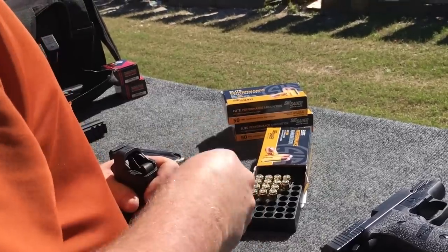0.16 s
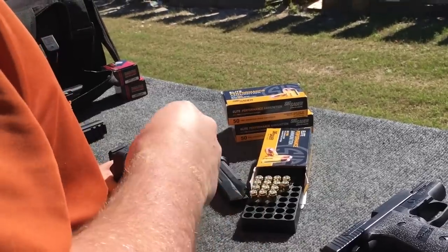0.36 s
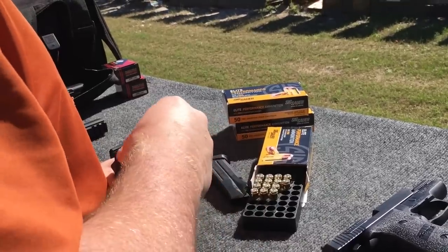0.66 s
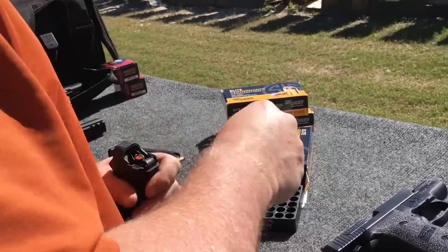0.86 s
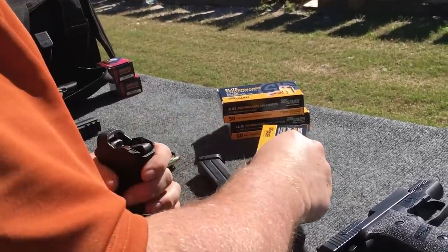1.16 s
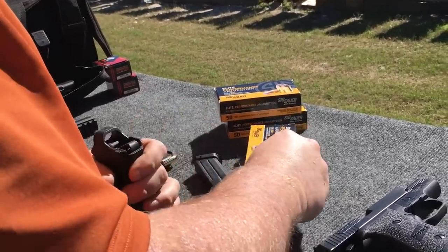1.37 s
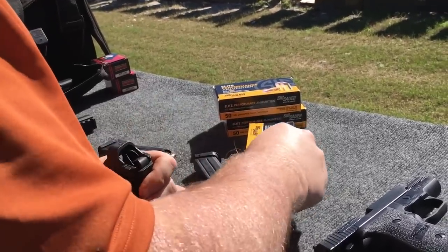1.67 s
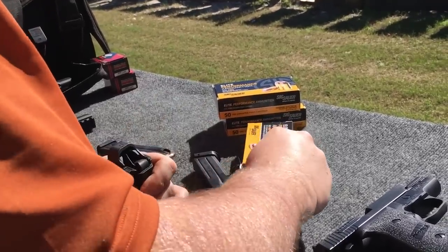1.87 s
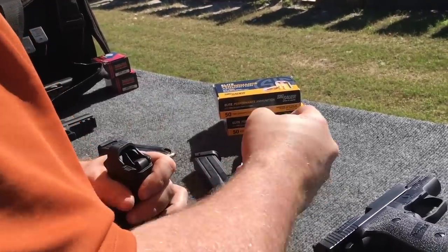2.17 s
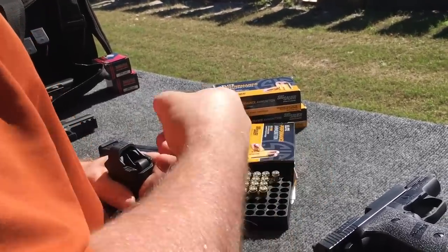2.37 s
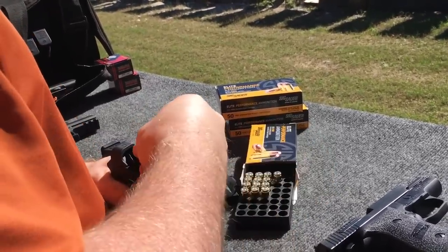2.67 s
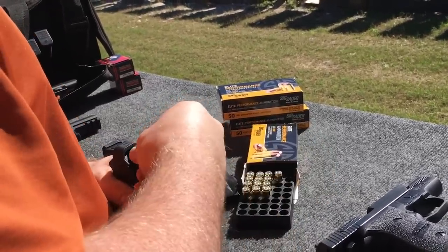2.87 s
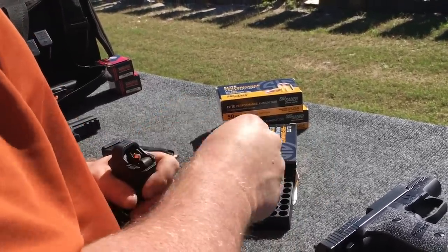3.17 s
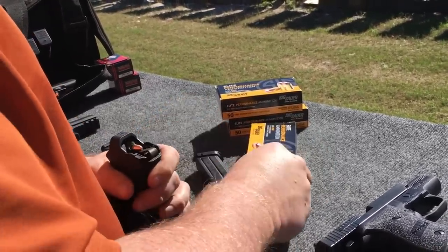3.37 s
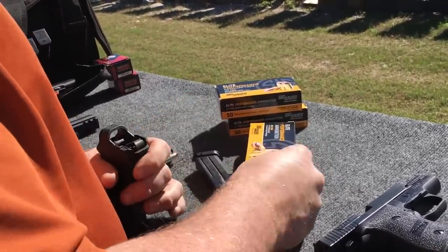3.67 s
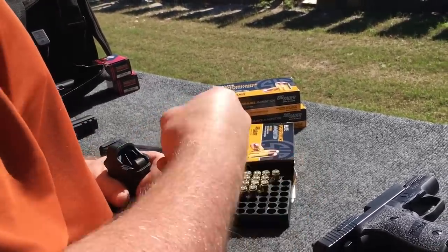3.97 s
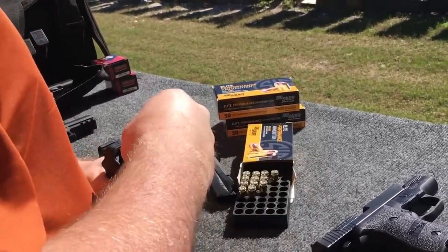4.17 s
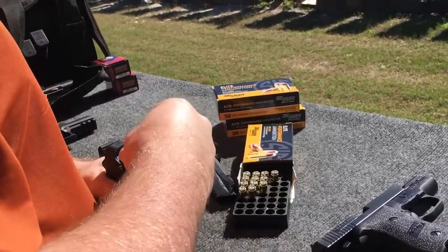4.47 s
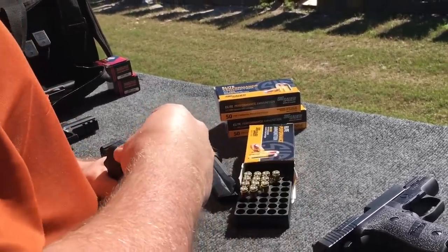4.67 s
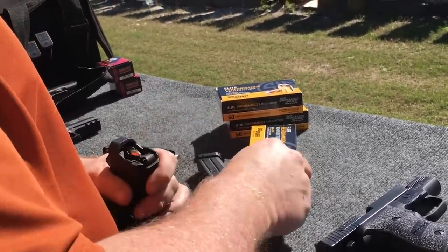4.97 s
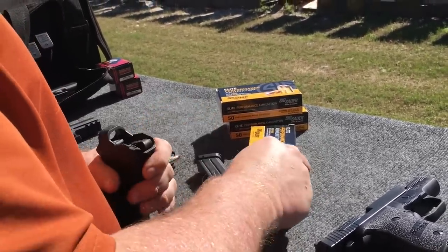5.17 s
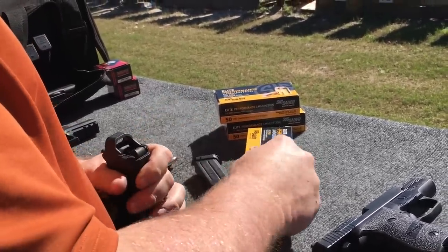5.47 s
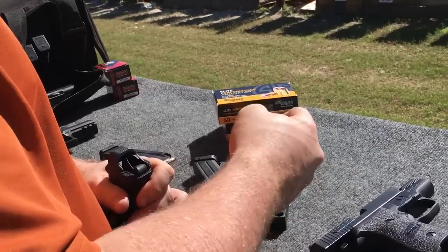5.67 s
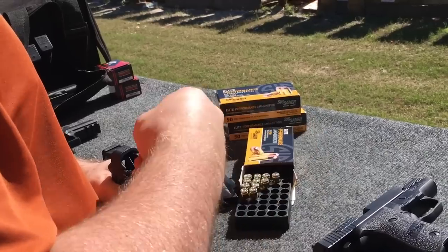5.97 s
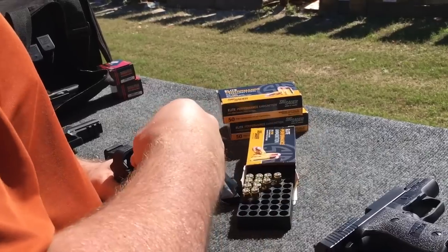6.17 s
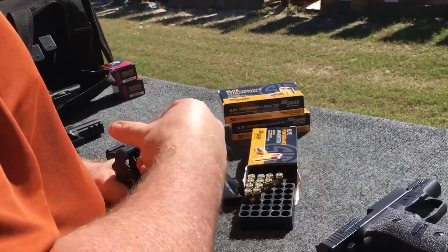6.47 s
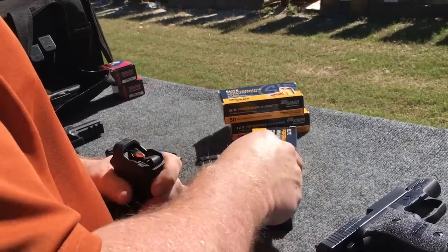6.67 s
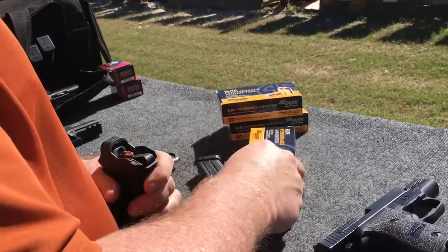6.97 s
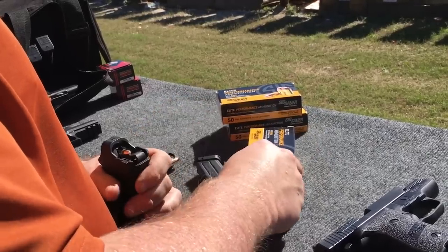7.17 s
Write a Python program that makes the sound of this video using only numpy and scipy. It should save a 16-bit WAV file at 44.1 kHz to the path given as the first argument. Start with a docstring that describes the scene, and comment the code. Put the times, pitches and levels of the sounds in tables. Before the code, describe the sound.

Close, crisp handling clicks come in uneven bursts as cartridges are pushed into a magazine with a plastic loader; a brass case briefly rings, and fingers and parts rub softly with tiny squeaks. Around them, gusts buffet the microphone with bassy pushes, flutter and popping snaps, growing stronger in the second half. Faint, smooth road noise lies far behind. Single-channel outdoor sound, dry and near.

```python
"""Cartridges are pressed into a pistol magazine with a plastic loader, outdoors on a carpeted table.
Each contact is a burst of noise that rings plastic, brass and steel close by; now and then a case rings on.
Slides are grainy noise that sticks and slips, with brief narrow squeaks.
Wind buffets the microphone with rumble, flutter, sagging low pushes and abrupt snaps.
Far traffic roars steadily behind it all, as smooth coloured noise."""
import sys
import numpy as np
from scipy import signal
from scipy.fft import rfft, irfft
from scipy.io import wavfile
from scipy.ndimage import uniform_filter1d

SR = 44100
rng = np.random.default_rng(int(sys.argv[2]) if len(sys.argv) > 2 else 0)


def store_pcm(level_fs):
    """Save levels as 16-bit WAV."""
    pcm = np.round(np.clip(level_fs, -1, 1) * 32767).astype(np.int16)
    wavfile.write(sys.argv[1], SR, np.atleast_2d(pcm).T)


N = 322812

# Contacts. Each row: start in seconds, then level in dB of loader body, brass case, magazine steel, sharp edge.
CONTACTS = [(0.605, -57.5, -39, -40.5, -40), (0.659, -55, -60, -52.5, -57), (0.699, -64, -50, -52, -57),
            (0.723, -61, -54, -61, -78), (0.76, -46, -49, -55, -53), (0.7677, -49, -35, -49.5, -39.5),
            (0.7944, -49, -61, -53, -55), (0.991, -59, -48, -54, -73), (1.0074, -61, -40, -45, -57),
            (1.021, -50, -50, -58, -60), (1.027, -40.5, -37, -31, -34), (1.0787, -56, -66, -61, -66),
            (1.106, -52, -49.5, -54.5, -56), (1.374, -47, -62, -66, -75), (1.404, -44, -53, -59, -62),
            (1.4571, -47, -55, -45, -48), (1.4829, -47.5, -77, -59, -72), (1.62, -62, -60, -68, -83),
            (1.6853, -39, -44, -49.5, -58), (1.7265, -48.5, -64, -75, -68), (1.791, -54, -58.5, -61, -79),
            (2.0835, -55, -69, -73, -87), (2.1004, -41.5, -55, -62, -85), (2.745, -47, -51, -43, -52),
            (2.8196, -53.5, -45, -45.5, -51), (2.9325, -55, -58, -45, -63), (2.9746, -52, -67, -53.5, -75),
            (3.0822, -55, -56.5, -49, -53.5), (3.089, -62, -59, -56, -69), (3.1441, -49, -41, -49.5, -50.5),
            (3.1521, -47, -54, -72, -76), (3.377, -62, -61, -66, -84.5), (3.3938, -61.5, -54, -59, -60),
            (3.405, -53, -50, -54, -56), (3.4176, -71, -52, -59, -62), (3.429, -56, -51, -44, -53),
            (3.4359, -35, -42, -29, -33), (3.4821, -49, -45, -39.5, -38.5), (3.5123, -51, -62, -53, -50),
            (3.519, -52, -59, -47.5, -56), (3.745, -53, -75, -65, -83), (3.799, -45.5, -54, -41.5, -49),
            (3.8635, -51, -44, -47, -55), (3.889, -64, -61, -61, -56), (3.924, -68, -58.5, -53, -56),
            (3.9605, -55, -63, -62, -77), (4.3543, -51, -46.5, -50, -60.5),
            (4.3606, -47.5, -43.5, -53, -58), (4.4702, -50.5, -52, -50.5, -57.5),
            (4.6196, -51.5, -45.5, -54, -61), (4.704, -54.5, -63, -55, -57), (4.7243, -55, -54, -60, -74),
            (4.8467, -52, -53, -53, -55), (4.8546, -49, -41, -48.5, -55), (4.8615, -52, -65, -58, -58),
            (4.9703, -54.5, -49, -58, -47.5), (5.005, -73, -46, -63, -60), (5.0222, -52, -45.5, -59, -49),
            (5.0369, -30, -46, -36.5, -39), (5.0405, -49, -41, -30.5, -33), (5.1057, -50.5, -40, -34, -39),
            (5.1443, -69, -58, -50, -54), (5.152, -46, -53, -51, -45.5), (5.2114, -50.5, -73, -66, -79),
            (5.256, -53, -82, -67, -68), (5.3915, -52, -52, -45.5, -43), (5.5557, -56, -56, -59, -57),
            (5.5838, -43, -51.5, -53, -80), (5.667, -41.5, -51, -57, -66), (5.6758, -48, -51, -49, -61),
            (6.2398, -44, -46.5, -49, -47.5), (6.291, -56, -56, -70, -78), (6.3149, -64, -39, -34.5, -36),
            (6.38, -58, -58, -59, -71), (6.5003, -50, -51, -58, -52), (6.5152, -53, -47, -63, -65),
            (6.5312, -48, -41, -44, -42.5), (6.5555, -64, -59, -63, -57), (6.7074, -57, -49, -51, -44.5),
            (6.7165, -63, -47, -61, -58.5), (6.733, -53, -57, -60, -62.5), (6.7443, -28, -37, -23, -26.5),
            (6.7512, -56, -50, -35, -32), (6.7965, -56, -58, -49, -56), (6.8295, -47, -57, -50.5, -48),
            (6.8436, -63, -70, -42.5, -42.5), (7.027, -60, -67.5, -81.5, -84), (7.2866, -47, -35, -38, -56)]
# What the contacts ring, one table per part. Each row: frequency in Hz, width in Hz, relative level in dB.
LOADER_BODY_MODES = [(1162, 370, 11), (1960, 340, 2), (2396, 160, 4.5)]
BRASS_CASE_MODES = [(2880, 2600, 3), (3740, 640, 8), (4270, 1700, 0.5)]
MAGAZINE_STEEL_MODES = [(4610, 1500, -2), (6100, 3200, 7.2), (6950, 660, 1.5), (7460, 1000, -6.5),
                        (8500, 770, -8)]
SHARP_EDGE_MODES = [(8860, 720, 2.3), (11440, 1200, -3), (13600, 910, -3), (15600, 1500, -8)]
# Table top, boxes and body scatter each click into a short tail, one row per part in the order above.
# Each row: level in dB against the tick, time to fall 60 dB in seconds.
SCATTER_TAILS = [(-22.5, 0.12), (-21, 0.14), (-31.5, 0.17), (-30, 0.082)]
MODE_SPREAD_DB = 5
TOP_OVER_LAST_MODE = 1.26   # above this multiple of its last mode a part falls off steeply
TICK_T60_S, CHATTER_T60_S, CHATTER_GAIN = 0.006, 0.032, 0.17

# A loose case rings briefly in the loader's throat. Each row: start in seconds, level in dB.
CASE_RINGS = [(.66, -52.5), (0.768, -31.5), (.798, -55), (4.848, -43), (4.859, -51), (6.53, -41),
              (6.555, -55)]
# Close modes of the brass tube.
# Each row: frequency in Hz, width in Hz, relative level in dB, time to fall 60 dB in seconds.
CASE_TUBE_MODES = [(3300, 350, -9, 0.045), (3450, 140, -1, 0.04), (3520, 300, -17, 0.13),
                   (3700, 350, -13, 0.045)]

# Slides of fingers, loader and brass. Each row: start in seconds, length in seconds, dull dB, bright dB.
SLIDES = [(0.155, 0.067, -85, -83), (0.694, 0.077, -72, -71), (0.762, 0.072, -64, -80),
          (0.981, 0.047, -61, -60), (1.012, 0.042, -53.5, -79), (1.244, 0.12, -71.5, -75),
          (1.378, 0.11, -71, -88), (1.451, 0.088, -69, -90), (1.544, 0.059, -79, -100),
          (1.685, 0.095, -69, -78), (1.976, 0.17, -81, -101), (2.054, 0.19, -88, -107),
          (2.932, 0.11, -91, -87), (3.377, 0.082, -70, -69), (3.48, 0.049, -69, -80),
          (3.61, 0.11, -80, -84), (3.738, 0.12, -79, -79), (3.844, 0.16, -75, -76),
          (4.017, 0.059, -81, -72.5), (4.687, 0.13, -72, -86), (4.99, 0.068, -74, -65),
          (5.22, 0.12, -78, -82), (5.312, 0.11, -82.5, -78), (5.615, 0.12, -68.5, -68),
          (5.72, 0.28, -100, -92), (6.267, 0.084, -70, -89), (6.34, 0.059, -78, -75),
          (6.485, 0.1, -62.5, -73), (6.699, 0.1, -67, -60), (6.792, 0.089, -67.5, -77),
          (7.233, 0.092, -78, -76)]
# Sleeve and skin brushing faintly between slides. Each row: time in seconds, dull level in dB.
BRUSHING = [(0.0, -87.5), (0.96, -85), (1.47, -74.5), (2.26, -85.5), (2.79, -93.5), (2.93, -82),
            (3.38, -87.5), (3.61, -77.5), (3.85, -73), (4.01, -99), (4.34, -85.5), (4.95, -76), (5.22, -75),
            (5.4, -84), (5.83, -77.5), (6.08, -82), (6.69, -78), (7.32, -81.5)]
# Colour of the rubbing hiss. Each row: frequency in Hz, relative level in dB per Hz.
RUB_COLOUR = [(1200, -18.5), (1800, 7.5), (3000, 1.5), (5200, -0.5), (8600, -8.5), (12400, -12.5),
              (16000, -12)]
# Parts that sing under a slide. Each row: frequency in Hz, width in Hz, level in dB against the hiss.
RUB_MODES = [(2390, 660, -14.5), (5000, 2200, -23), (8800, 400, -19.5), (12000, 660, -18)]
BRUSH_BRIGHT_DB = -11   # bright half of the brushing, below the dull one
SLIPS_PER_S, SLIP_DB, SLIP_SPREAD_DB = 76, 2, 1.0

# A part sings in a narrow band while rubbed.
# Each row: start in seconds, length in seconds, frequency in Hz, level in dB.
SQUEAKS = [(1.292, 0.015, 2390, -64), (1.72, .02, 2530, -68), (2.82, .06, 5170, -76),
           (3.002, .03, 5360, -77), (3.039, .018, 5260, -75), (5.748, 0.37, 4390, -85.5),
           (6.28, 0.02, 2000, -59), (6.286, .022, 3750, -64), (6.288, 0.014, 5000, -66)]
SQUEAK_WIDTH_HZ = 500

# Strength of the wind on the microphone. Each row: time in seconds, rumble level in dB, flutter level in dB.
GUSTS = [(0.0, -52.5, -68), (0.28, -49.5, -67), (0.92, -51.5, -60.5), (1.14, -46, -64), (2.16, -44, -59.5),
         (2.32, -42, -66), (2.55, -50, -64), (2.71, -44, -58), (2.89, -48.5, -70), (3.02, -49, -63.5),
         (3.36, -43, -59), (3.57, -37, -46), (3.91, -44, -54), (4.08, -42, -59.5), (4.49, -41.5, -56.5),
         (4.73, -44, -59.5), (4.93, -41, -55), (5.18, -39.5, -51.5), (5.4, -37, -48), (5.79, -40, -50.5),
         (6.16, -41, -50.5), (6.38, -37.5, -48.5), (6.61, -40, -51.5), (6.85, -35.5, -42.5),
         (7.2, -41, -53.5), (7.32, -43.5, -44)]
# Colours of the turbulence. Each row: frequency in Hz, relative level in dB per Hz.
RUMBLE_COLOUR = [(25, -32.5), (40, -19), (60, 1.5), (90, 1.5), (140, 0), (220, -12.5), (320, -28.5)]
FLUTTER_COLOUR = [(140, -5), (220, 7), (320, -0.5), (450, -14), (700, -34.5)]
LUMP_RATE_HZ, RUMBLE_LUMP_DB, FLUTTER_LUMP_DB = 16, 2, 4
WAKE_S, WAKE_RUMBLE_DB, WAKE_FLUTTER_DB = 0.02, -20, -26   # turbulence around each eddy, below its level

# Single eddies. Each row: middle in seconds, level in dB, mid frequency in Hz, length in cycles.
EDDIES = [(0.533, -34, 105, 1.8), (0.898, -34, 107, 2.2), (0.924, -22, 149, 1.07),
          (0.992, -28.5, 115, 1.17), (1.163, -33.5, 156, 1.1), (1.308, -29.5, 79, 1.45),
          (1.384, -30.5, 113, 1.2), (1.449, -28.5, 127, 0.52), (1.657, -25, 145, 0.55),
          (1.732, -27.5, 152, 0.72), (1.912, -37, 99, 1.3), (2.03, -31.5, 178, 3.4),
          (2.223, -21.5, 94, 0.4), (2.308, -21.5, 125, 0.56), (2.551, -19, 156, 0.6),
          (2.637, -33.5, 129, 2.7), (2.794, -34, 101, 1.7), (2.915, -22, 131, 0.63),
          (3.002, -23, 151, 0.69), (3.097, -21.5, 168.4, 3.3), (3.122, -24.5, 105, 0.9),
          (3.156, -18.5, 122, 0.83), (3.177, -33.5, 86, 0.47), (3.237, -26, 116, 1.2),
          (3.405, -24.5, 146, 2.2), (3.466, -23, 148, 0.87), (3.557, -22, 202, 1.35), (3.678, -25, 137, 1),
          (3.733, -22.5, 139, 1.3), (3.854, -18.5, 196, 0.79), (3.985, -23, 128, 1.5),
          (4.026, -16.5, 124, 0.81), (4.059, -22.5, 169, 0.88), (4.112, -22.5, 118, 0.44),
          (4.229, -26.5, 102, 1.45), (4.372, -23.5, 139, 0.49), (4.397, -25, 131, 0.4),
          (4.49, -30, 95, 1.7), (4.636, -24, 92, 0.44), (4.894, -31.5, 109, 1.2), (4.991, -23, 153, 0.43),
          (5.034, -29, 113, 0.9), (5.107, -27.5, 170, 0.72), (5.142, -30, 151, 1.1),
          (5.178, -26.5, 155, 1.3), (5.265, -21.5, 133, 0.4), (5.345, -22.5, 171, 1.1),
          (5.434, -27.5, 171, 0.86), (5.532, -21.5, 218, 0.47), (5.768, -24, 133, 0.73),
          (5.901, -22.5, 157, 0.84), (5.976, -26.5, 104, 0.71), (6.1, -25.5, 135, 1.5),
          (6.152, -27, 232, 2.2), (6.197, -26.5, 133, 1), (6.287, -27, 121, 1.5), (6.741, -37, 113, 1.2),
          (6.808, -31, 157, 1.7), (6.898, -26.5, 176, 1.4), (6.936, -26, 127, 0.59),
          (6.965, -27.5, 123, 1.3), (7.013, -24, 161, 1.8), (7.129, -26, 139, 1.1), (7.244, -24.5, 173, 2)]
# Abrupt higher snaps of the wind. Each row: start in seconds, peak in dB, frequency in Hz.
SNAPS = [(0.915, -35, 347), (1.373, -38.5, 380), (1.729, -32.5, 301), (2.026, -22.5, 304),
         (2.076, -41, 301), (2.215, -35, 301), (2.278, -35.5, 326), (2.333, -42, 301), (2.526, -35, 301),
         (2.551, -28.5, 361), (2.908, -48, 301), (2.998, -38, 307), (3.087, -18.5, 339), (3.137, -34, 307),
         (3.163, -29.5, 385), (3.55, -31, 301), (3.848, -26.5, 304), (4.024, -32, 487), (4.054, -33, 350),
         (4.381, -37.5, 336), (5.137, -47, 328), (5.27, -33, 350), (5.342, -32, 301), (5.521, -26.5, 361),
         (5.794, -30, 307), (5.895, -37, 301), (5.953, -37, 301), (6.148, -29, 301), (6.193, -33, 339),
         (6.805, -29.5, 358), (6.896, -37, 301), (6.993, -27.5, 382), (7.176, -35.5, 530),
         (7.238, -30.5, 347)]
SNAP_TOP_HZ = 1150
SNAP_FADE_CYCLES = 0.87   # cycles to fall to 1/e

# Colour of the far traffic. Each row: frequency in Hz, relative level in dB per Hz.
TRAFFIC_COLOUR = [(240, -27.5), (400, -6), (467, -15), (563, -4), (638, -7), (793, -0.5), (1070, -11.5),
                  (1290, -11.5), (1930, -30.5), (3880, -39.5), (11000, -45.5), (13100, -50.5), (16500, -55)]
TRAFFIC_DB, TRAFFIC_SWELL_DB, TRAFFIC_SWELL_HZ = -62.5, 1.6, 0.24

BASS_CUT_HZ, TOP_CUT_HZ = 38, 17000


def from_db(db):
    """Decibels to gain."""
    return 10 ** (np.asarray(db) / 20)


def rms_one(x):
    """Scale to rms 1."""
    return x / np.sqrt(np.mean(x ** 2) + 1e-20)


def in_time(rows):
    """Columns of a curve, drawn in straight lines to one value per sample."""
    s, *columns = np.transpose(rows)
    return [np.interp(np.arange(N) / SR, s, column) for column in columns]


def drift(rate_hz):
    """Slow chance: noise twice through a one-pole low-pass, made at a fortieth of the rate; spread 1."""
    r = np.exp(-2 * np.pi * rate_hz * 40 / SR)
    noise = rng.standard_normal(N // 40 + 2002)
    slow = signal.lfilter([1], [1, -2 * r, r * r], noise)[2000:]   # skip the filter settling
    return np.interp(np.arange(N) / 40, np.arange(len(slow)), rms_one(slow))


def coloured(x, spectrum):
    """Shape x to a spectrum joined up over log frequency, -80 dB outside it; rms 1."""
    hz, level_db = np.transpose(spectrum)
    bins_hz = np.maximum(np.arange(N // 2 + 1) * SR / N, 1)
    shape_db = np.interp(np.log(bins_hz), np.log(hz), level_db, left=-80, right=-80)
    return rms_one(irfft(rfft(x) * from_db(shape_db), N))


def resonance(x, hz, width_hz):
    """Two-pole resonance along the last axis, gain about 1 on top."""
    r = np.exp(-np.pi * width_hz / SR)
    return signal.lfilter([1 - r, 0, r - 1], [1, -2 * r * np.cos(2 * np.pi * hz / SR), r * r], x)


def low_pass(x, hz):
    """Steep treble cut along the last axis."""
    return signal.sosfilt(signal.butter(4, hz, fs=SR, output="sos"), x)


def add(track, pieces, starts_s):
    """Lay short pieces into a track at their start times."""
    for piece, s in zip(pieces, starts_s):
        i = max(int(s * SR), 0)
        track[i:i + len(piece)] += piece[:N - i]


def clicks():
    """Tick, chatter and scattered tail ring the four parts; each mode's strength varies with the spot struck."""
    s, *levels_db = np.transpose(CONTACTS)
    t = np.arange(5000) / SR
    tick = from_db(-60 * t / TICK_T60_S)
    chatter = CHATTER_GAIN * from_db(-60 * t / CHATTER_T60_S)
    onset = np.minimum(t / 0.00019, 1)
    parts = LOADER_BODY_MODES, BRASS_CASE_MODES, MAGAZINE_STEEL_MODES, SHARP_EDGE_MODES
    pieces = 0
    for modes, level_db, (tail_db, tail_t60) in zip(parts, levels_db, SCATTER_TAILS):
        tail = from_db(tail_db - 60 * t / tail_t60)
        strike = ((tick + chatter) * onset + tail) * rng.standard_normal((len(s), len(t)))
        spot_db = MODE_SPREAD_DB * rng.standard_normal((len(s), len(modes)))
        rung = 0
        for k, (hz, width_hz, db) in enumerate(modes):
            gain = (-1) ** k * from_db(db + spot_db[:, [k]]) / np.sqrt(width_hz)   # alternating polarity
            rung = rung + gain * resonance(strike, hz, width_hz)
        rung = low_pass(rung, TOP_OVER_LAST_MODE * modes[-1][0])
        # level is the peak of a sine as strong as the loudest millisecond
        power = uniform_filter1d(rung ** 2, size=44, axis=1).max(axis=1)
        pieces = pieces + rung * (from_db(level_db) / np.sqrt(2 * power))[:, None]
    out = np.zeros(N)
    add(out, pieces, s)
    return out


def case_rings():
    """Close modes of the brass tube, kept rough by the case rattling as it settles."""
    s, level_db = np.transpose(CASE_RINGS)[:, :, None]
    t = np.arange(6000) / SR
    onset = np.minimum(t / 0.00037, 1)
    pieces = 0
    for hz, width_hz, db, t60 in CASE_TUBE_MODES:
        noise = rng.standard_normal((len(s), 8000))
        rattle = resonance(resonance(noise, hz, width_hz), hz, width_hz)[:, 2000:]
        pieces = pieces + from_db(level_db + db - 60 * t / t60) * onset * rms_one(rattle)
    out = np.zeros(N)
    add(out, pieces, s[:, 0])
    return out


def rub():
    """Stick and slip: dense uneven grains, a dull and a bright half, under each slide and faintly between."""
    dull_gain, = from_db(in_time(BRUSHING))
    bright_gain = from_db(BRUSH_BRIGHT_DB) * dull_gain
    for s, length_s, dull_db, bright_db in SLIDES:
        stroke = signal.windows.tukey(int(length_s * SR), .8)
        add(dull_gain, [from_db(dull_db) * stroke], [s])
        add(bright_gain, [from_db(bright_db) * stroke], [s])
    unevenness_db = 0.87 * drift(200.0) + 1.1 * drift(27.0)
    grains = rng.standard_normal(N) * from_db(unevenness_db)
    slip_gain = from_db(SLIP_DB + SLIP_SPREAD_DB * rng.standard_normal(N))
    slips = (rng.random(N) < SLIPS_PER_S / SR) * slip_gain
    grains = grains * (1 + signal.lfilter([1], [1, -.985], slips))   # each slip flares for a millisecond or two
    hiss = coloured(grains, RUB_COLOUR)
    for hz, width_hz, db in RUB_MODES:
        hiss = hiss + from_db(db) * rms_one(resonance(grains, hz, width_hz))
    dull = signal.lfilter(*signal.butter(1, 6000, fs=SR), hiss)
    bright = hiss - dull
    return dull_gain * rms_one(dull) + bright_gain * rms_one(bright)


def squeaks():
    """Rubbing noise twice through one narrow resonance, swelling and fading."""
    out = np.zeros(N)
    for s, length_s, hz, db in SQUEAKS:
        noise = rng.standard_normal(20000)
        song = resonance(resonance(noise, hz, SQUEAK_WIDTH_HZ), hz, SQUEAK_WIDTH_HZ)
        swell = signal.windows.tukey(int(length_s * SR), .7)
        add(out, [from_db(db) * swell * rms_one(song)[-len(swell):]], [s])
    return out


def wind():
    """Turbulence at the microphone port: rumble and flutter throb together and swell around each eddy."""
    rumble_db, flutter_db = in_time(GUSTS)
    s, eddy_db = np.transpose(EDDIES)[:2, :, None]
    t = (np.arange(8000) - 4000) / SR
    wake = np.zeros(N)
    add(wake, from_db(eddy_db) * np.exp(-(t / WAKE_S) ** 2), s[:, 0] + t[0])
    lumps = drift(LUMP_RATE_HZ)
    rumble = coloured(rng.standard_normal(N), RUMBLE_COLOUR)
    rumble = rumble / np.sqrt(uniform_filter1d(rumble ** 2, size=3000))   # even out its own slow swells
    flutter = coloured(rng.standard_normal(N), FLUTTER_COLOUR)
    rumble_gain = from_db(rumble_db + RUMBLE_LUMP_DB * lumps) + from_db(WAKE_RUMBLE_DB) * wake
    flutter_gain = from_db(flutter_db) + from_db(WAKE_FLUTTER_DB) * wake
    flutter_gain = flutter_gain * from_db(FLUTTER_LUMP_DB * lumps)
    return rumble_gain * rumble + flutter_gain * flutter


def buffets():
    """An eddy pushes the membrane for a few cycles at most, sagging in pitch."""
    s, level_db, hz, cycles = np.transpose(EDDIES)[:, :, None]
    t = (np.arange(6000) - 3000) / SR
    swell = np.exp(-2.8 * (t * hz / cycles) ** 2)
    turns = hz * t * (1 - 17.0 * t) + rng.random(s.shape)   # random starting phase
    push = swell * np.sin(2 * np.pi * turns)
    out = np.zeros(N)
    add(out, from_db(level_db) * push, s[:, 0] + t[0])
    return out


def snaps():
    """A snap of wind sets in abruptly, either way round, and dies in about two cycles."""
    s, peak_db, hz = np.transpose(SNAPS)[:, :, None]
    t = np.arange(1500) / SR
    snap = np.exp(-t * hz / SNAP_FADE_CYCLES) * np.sin(2 * np.pi * hz * t)
    snap = low_pass(snap, SNAP_TOP_HZ) * rng.choice([-1, 1], s.shape)
    out = np.zeros(N)
    add(out, from_db(peak_db) * snap / np.abs(snap).max(axis=1, keepdims=True), s[:, 0])
    return out


def traffic():
    """Far tyre roar: smooth coloured noise, swelling a little."""
    level_db = TRAFFIC_DB + TRAFFIC_SWELL_DB * drift(TRAFFIC_SWELL_HZ)
    return from_db(level_db) * coloured(rng.standard_normal(N), TRAFFIC_COLOUR)


def scene():
    """Hands close by, wind on the microphone, road far off."""
    hands = clicks() + case_rings() + rub() + squeaks()
    air = wind() + buffets() + snaps()
    return (hands + air + traffic())[None]


def record(dry):
    """The microphone drops the deepest bass; the top is cut, 70 dB down from the cut upwards."""
    x = signal.sosfilt(signal.butter(4, BASS_CUT_HZ, "high", fs=SR, output="sos"), dry)
    return signal.sosfilt(signal.cheby2(12, 70, TOP_CUT_HZ, fs=SR, output="sos"), x)


dry = scene()
out = record(dry)
store_pcm(out)
```